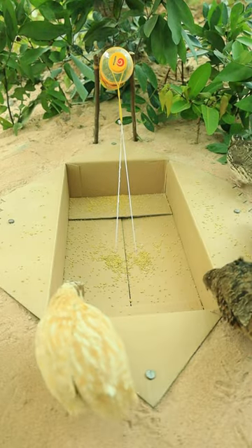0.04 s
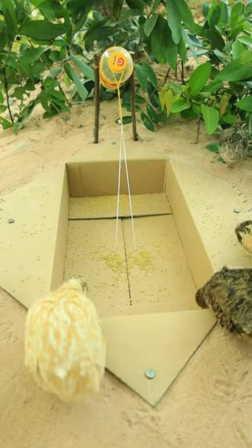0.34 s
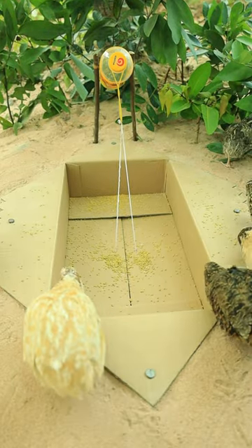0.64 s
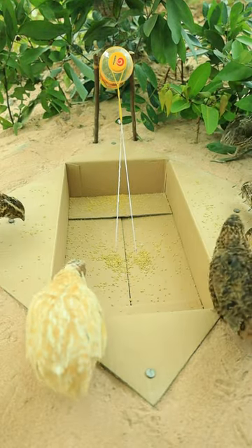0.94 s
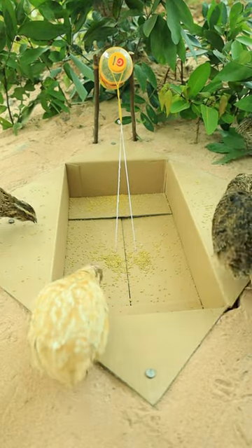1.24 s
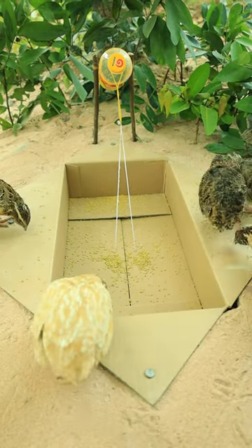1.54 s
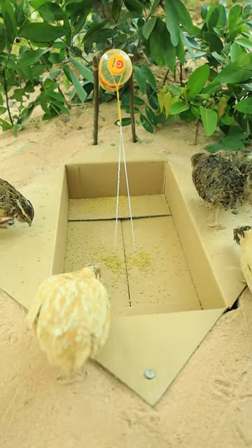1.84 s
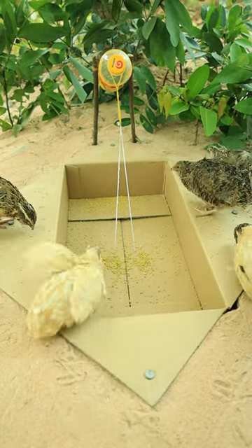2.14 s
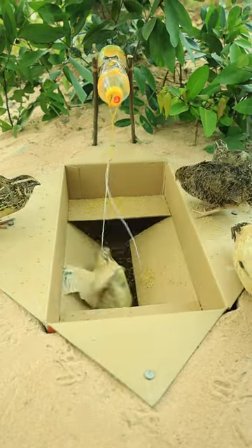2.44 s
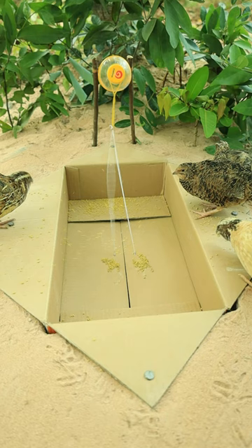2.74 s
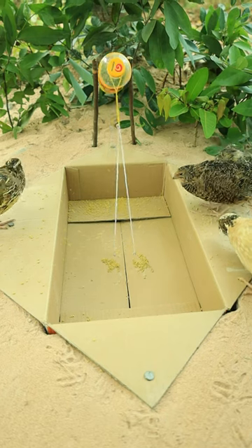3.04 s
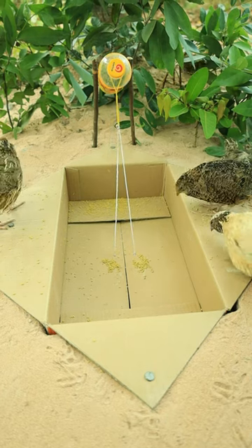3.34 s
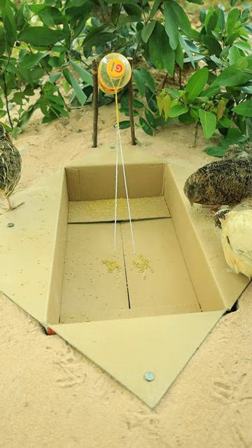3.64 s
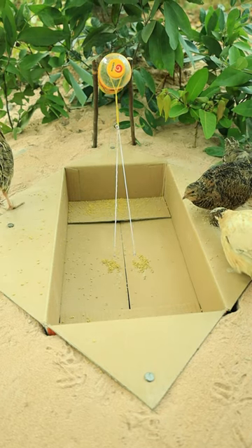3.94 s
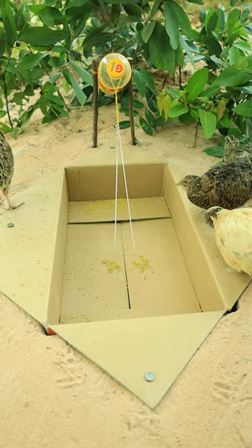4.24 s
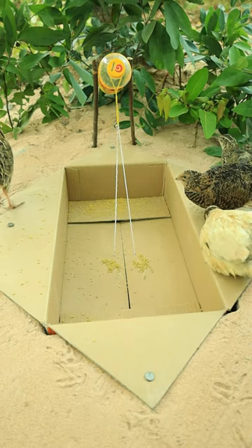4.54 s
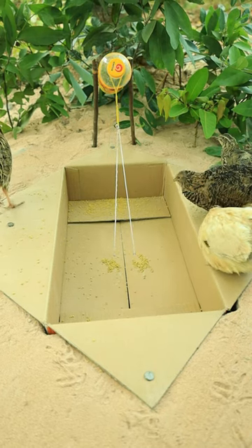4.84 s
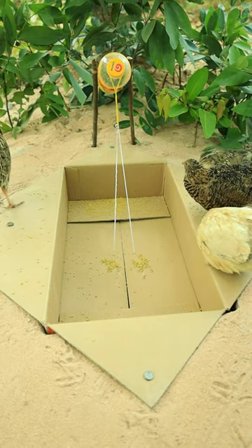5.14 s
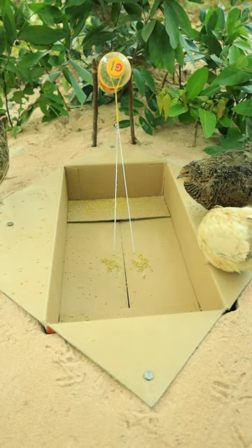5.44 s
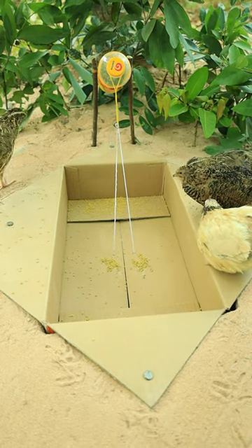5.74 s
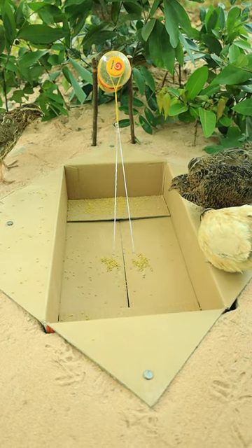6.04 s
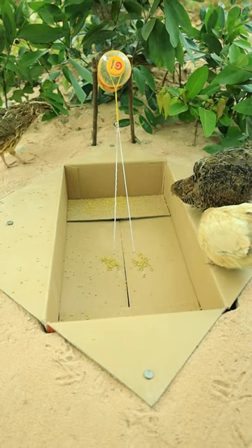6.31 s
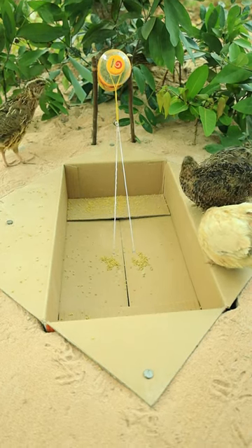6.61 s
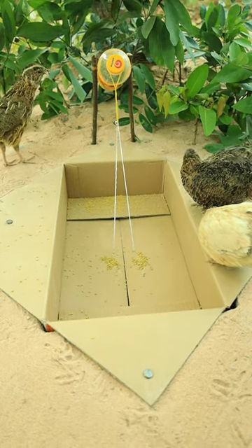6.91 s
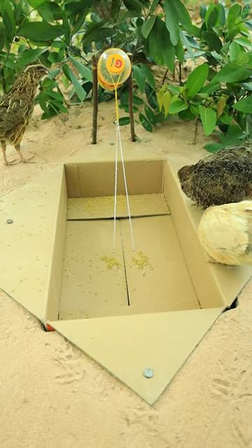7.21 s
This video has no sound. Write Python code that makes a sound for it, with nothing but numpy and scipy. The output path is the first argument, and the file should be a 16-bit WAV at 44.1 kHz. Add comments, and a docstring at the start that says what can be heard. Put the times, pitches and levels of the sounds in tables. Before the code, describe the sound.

Irregular beak taps on cardboard mix with sandy scratching, cracking seeds and brief soft peeps from quail near the microphone. Then comes the loudest moment: a bird drops into a hollow box, bumping and beating its wings as grain slides after it. The rush fades within a second and the clacking pecks carry on, above quiet outdoor air and a faint far hum.

```python
"""In a sandy yard, quail peck grain and scratch about on a cardboard pit trap, peeping softly.
Each peck is an impact that excites the modes of the sheet: it clacks, and the wide flaps boom.
Seeds snap and feet rub sand over the card, above quiet air and a faint far hum. One bird drops
through the trapdoor with thumps that resonate in the box, beating wings and a rush of sliding
grain; the others go on pecking."""
import sys
import numpy as np
from scipy import signal
from scipy.fft import rfft, irfft, next_fast_len
from scipy.io import wavfile
from scipy.ndimage import uniform_filter1d

SR = 44100
rng = np.random.default_rng(int(sys.argv[2]) if len(sys.argv) > 2 else 0)


def output_pcm(signal):
    """Save a mono or channel-first signal as 16-bit PCM at the path in sys.argv[1].

    Samples are clipped to [-1, 1] before scaling.
    """
    pcm = np.clip(np.atleast_2d(signal).T, -1, 1) * 32767
    wavfile.write(sys.argv[1], SR, np.round(pcm).astype(np.int16))


N = 329427
TIME = np.arange(N) / SR

# Likeness of the sound at the two microphone ports: (frequency [Hz], correlation [-1 to 1])
PORT_CORRELATION = [(200, .999), (650, .98), (1400, .75), (2900, .3), (7000, .12), (15000, -.06)]
# Imbalance of the ports: (frequency [Hz], left over right [dB])
PORT_BALANCE = [(200, 0.5), (450, 2), (1300, 1.5), (2400, 3.5), (4400, -0.2), (8100, 3.5), (13000, -2)]
# Spectrum of the outdoor air: (frequency [Hz], relative level [dB])
AIR_SPECTRUM = [(15, -48.5), (25, -5.5), (236, -2.5), (285, -4), (489, -6.5), (607, -11), (1070, -14.5),
                (1160, -12), (1480, -14), (2610, -12.5), (3160, -18.5), (4490, -19.5), (16000, -31.5)]
# Bouts of shuffling feet: (start [s], duration [s], relative level [dB], sandiness [dB]);
# sandiness favours the hiss over the scrape
SHUFFLES = [(0, .32, -51.5, -2), (0.436, 0.11, -61, 10), (0.596, 0.14, -47, -2.5), (0.812, 0.16, -43, -2.5),
            (1.04, 0.32, -43, -3), (1.345, 0.069, -45, -4), (1.404, 0.089, -33, -7),
            (1.519, 0.13, -38.5, -5.5), (1.6, 0.29, -45, -3.5), (1.917, .12, -42.5, -7.5),
            (2.068, 0.15, -29.5, -8.5), (3.196, .42, -45, 0), (3.665, .19, -44, -6),
            (4.223, 0.043, -38.5, -3), (4.344, 0.15, -43, -8.5), (4.459, 0.13, -44, -1.5),
            (4.56, 0.17, -55, -3), (5.277, .16, -49, -3), (5.482, 0.082, -53.5, -8),
            (5.895, 0.4, -60, -3.5), (6.491, 0.16, -56, -6)]
# Grain pours as the trapdoor tips and again as it swings back:
# (start [s], rise [s], hold [s], decay rate [dB/s], relative level [dB], sandiness [dB])
POURS = [(2.196, .14, 0.12, 187, -29.5, 0.5), (2.486, 0.09, 0.24, 34, -32.5, 4)]
# Spectrum of grain rubbing the cardboard: (frequency [Hz], relative level [dB])
SCRAPE_SPECTRUM = [(130, -6), (220, -1.5), (297, -7.5), (357, -4), (501, -7.5), (564, -1.5), (695, -1.5),
                   (989, -7), (1370, 0), (1730, 2.5), (1950, -7.5), (2710, 0), (5000, -23), (6500, -52),
                   (11000, -120)]
# Spectrum of sliding sand and seed: (frequency [Hz], relative level [dB])
HISS_SPECTRUM = [(2500, -17), (3700, 2), (4900, 1.5), (7500, 3.5), (8700, -4.5), (10500, 3.5), (12000, -2),
                 (14500, 5), (16000, -9.5)]
# Short gritty scrapes, faint ticks and the bright sparkle of some pecks:
# (start [s], duration [s], level [dB], centre [Hz], half-width [octaves])
GRIT_BURSTS = [(0.15, 0.033, -40, 6040, 3.4), (0.495, 0.018, -40.5, 1720, 0.95),
               (0.819, 0.0097, -37, 11000, 1), (0.836, 0.0074, -23.5, 13200, 0.49),
               (0.888, 0.068, -37, 3270, 0.36), (1.187, 0.04, -36.5, 3050, 0.61),
               (1.43, 0.012, -29, 6550, 1.2), (1.459, 0.011, -30.5, 7940, 0.48),
               (2.035, 0.11, -35, 2970, 1.5), (2.151, 0.046, -32, 5630, 0.72),
               (2.347, 0.085, -30, 1470, 1.1), (2.437, 0.032, -24.5, 2900, 0.43),
               (2.626, 0.057, -24.5, 11700, 0.34), (3.462, 0.099, -33.5, 4150, 0.87),
               (3.576, 0.012, -32.5, 3650, 1.1), (4.095, 0.01, -39.5, 1730, 0.64),
               (4.217, 0.087, -44, 3520, 1.1), (4.289, 0.051, -40, 2430, 1.2),
               (4.453, 0.059, -35, 1920, 1.4), (4.794, 0.0085, -35, 12800, 0.32),
               (6.129, 0.018, -43.5, 1700, 1.8), (7.358, 0.021, -46.5, 900, 1.26)]
# Calls: (start [s], duration [s], relative level [dB], first pitch [Hz], middle [Hz], last [Hz])
PEEPS = [(0.001, 0.039, -28, 3550, 3010, 2880), (0.03, 0.027, -37.5, 3540, 3680, 3580),
         (0.709, 0.036, -38.5, 2570, 2950, 2840), (0.763, 0.039, -41.5, 1010, 903, 960),
         (1.154, 0.018, -36, 1050, 1500, 2100), (1.174, 0.048, -34.5, 1604, 1343, 1570),
         (1.369, 0.042, -31, 1210, 1596, 1980), (1.529, 0.033, -30, 2150, 2055, 1560),
         (1.909, 0.072, -39, 1440, 2550, 2830), (2.075, .036, -31.5, 3680, 3250, 3050),
         (4.348, 0.062, -34.5, 1373, 1747, 1790), (4.387, 0.039, -35.5, 1990, 2150, 1380)]
# Seeds breaking in a beak or under a claw: (time [s], level [dB])
SNAPS = [(0.168, -42), (0.5376, -43), (1.2345, -33.5), (1.3164, -40), (1.5146, -41), (1.708, -32),
         (2.0996, -45), (2.782, -48), (3.0626, -30.5), (3.204, -34), (3.268, -36.5), (4.3847, -38.5),
         (4.5203, -37)]
# Envelope of the wings beating in the pit: (time [s], relative level [dB])
WING_ENVELOPE = [(2.15, -41.5), (2.526, -35.5), (3.05, -46)]
# Spectrum of the buffeted air in the pit: (frequency [Hz], relative level [dB])
PIT_SPECTRUM = [(29, -35), (50, -24), (91, 9), (136, 26), (385, 3), (491, -37), (800, -15), (1040, -48),
                (1760, -120)]
# Modes of the cardboard: (frequency [Hz], relative level [dB], decay time T60 [s])
CARDBOARD_MODES = [(93, -37, 0.35), (114.8, -17, 1), (127.9, 5, 0.14), (179.4, 3, 0.065), (188, -1.5, 0.08),
                   (227.3, -2, 0.063), (294.5, -3, 0.054), (375.7, -6, 0.06), (480, -2.5, 0.039),
                   (622, -4, 0.04), (753, -6.5, 0.08), (919, -5, 0.041), (1211, 3, 0.031), (1497, 1, 0.05),
                   (1639, 11.5, 0.021), (1753, -3, 0.068), (2100, -11, 0.083), (2424, -2, 0.038),
                   (2732, 0.5, 0.033), (2930, -8, 0.019), (3170, -4.5, 0.059)]
# Bands of an impact's boom, knock, clack and tick: (lower edge [Hz], upper edge [Hz])
IMPACT_BANDS = [(75, 215), (190, 1000), (1000, 4000), (4000, 16000)]
# Resonance of the hollow box under the trapdoor: (frequency [Hz], relative level [dB])
BOX_SPECTRUM = [(60, -16), (110, 4), (170, 9.5), (330, -3), (480, 3), (700, -18), (1500, -31), (4000, -70)]
# Bumps of the falling bird and the trapdoor; hardness is the level of clack over knock:
# (time [s], strength [dB], boom re strength [dB], hardness [dB], knock frequency [Hz])
BUMPS = [(2.232, -33, -5, -13.5, 240), (2.2626, -23.5, 0, -8.5, 683), (2.2815, -24.5, 6.5, -0.5, 303),
         (2.3468, -20.5, 1, -7.5, 510), (2.4092, -34, 19.5, -12, 885), (2.4426, -23, 5.5, 12, 730),
         (2.4502, -23.5, 1, 6, 687), (2.5687, -22, 4.5, -15.5, 550), (2.6186, -29, 3, -1, 510),
         (2.667, -33, 10.5, -8, 476), (2.7187, -25, 3, 0.5, 274), (2.729, -29.5, 10, -14, 262)]
# Pecks and steps on the cardboard: (time [s], strength [dB], boom re strength [dB], hardness [dB])
PECKS = [(0.0843, -35.5, -22, -4), (0.1503, -37.5, -19, -9), (0.1675, -31, -21, -1.5),
         (0.5368, -38.5, -11, -5.5), (0.701, -38, 4.5, -2), (0.823, -38, -12, 2), (0.836, -27, -5.5, 2.5),
         (0.8854, -36, 2, 7), (0.904, -37, -15, 2), (0.9627, -32, -30, 2), (1.0881, -43.5, 6.5, -15.5),
         (1.3171, -28.5, -7.5, 6), (1.377, -32.5, -12, 6.5), (1.415, -34, -24, -1), (1.5138, -36, -15, -1),
         (1.5613, -27.5, -7.5, 10.5), (1.6475, -38, 1, 8), (1.7064, -32.5, -2, -2.5),
         (1.7542, -42.5, 5, -7), (1.787, -27, -5, 7.5), (1.9471, -28.5, -1, 9.5), (2.1014, -34, -3, 10),
         (2.947, -33, 2, 5), (3.1124, -44.5, 8.5, -8), (3.2733, -28.5, -6, -2.5), (3.4483, -33.5, 4, 9.5),
         (3.6417, -33.5, -2, -0.5), (3.7947, -32.5, 1.5, -1.5), (3.9722, -30, -1, -2),
         (4.1573, -28.5, 0, 7.5), (4.3647, -30, 1.5, 3), (4.474, -38.5, -9, 20.5), (4.5196, -31, -12, 4.5),
         (4.5612, -28, -7, 6.5), (4.8051, -31, -0.5, 2), (5.019, -35.5, 4.5, 0.5), (5.214, -32, 0, 1),
         (5.3323, -41.5, 12, -7), (5.3613, -39.5, 0, 7.5), (5.4049, -40, 8, -11.5),
         (5.533, -41.5, 4.5, 5.5), (5.7532, -40.5, 3, 6.5), (5.9896, -39.5, 4.5, -3.5),
         (6.0987, -32, 0, 1.5), (6.2193, -39.5, 8.5, 3), (6.3032, -37, 1.5, 1), (6.4485, -37.5, 2, 2.5),
         (6.5437, -35.5, -5, 0), (6.597, -44.5, -9, -3), (6.6822, -38.5, 1.5, 1), (6.727, -38, -4.5, 1),
         (6.8685, -35.5, 2, 0.5), (6.9048, -31.5, -3, -3.5), (7.0608, -28, -2.5, -2.5), (7.09, -44.5, 7, 4),
         (7.2256, -35, -2, -6.5), (7.4477, -32, -6, 7)]


def amp(db):
    """Amplitude ratio of a level in decibels."""
    return 10 ** (np.asarray(db) / 20)


def unit(x):
    """Normalisation to an RMS of one."""
    return x / np.sqrt(np.mean(x ** 2) + 1e-20)


def curve_at(points, hz):
    """Interpolation of (frequency, value) points on a logarithmic frequency axis."""
    f, value = np.transpose(points)
    return np.interp(np.log(hz + 1), np.log(f + 1), value)


def add(mix, start, sound):
    """Superposition of a sound on the mix from a start time in seconds."""
    part = mix[:, max(round(start * SR), 0):][:, :sound.shape[1]]
    part += sound[:, :part.shape[1]]


def bandpass(x, edges_hz):
    """Butterworth filtering to one band."""
    return signal.sosfilt(signal.butter(3, edges_hz, "band", fs=SR, output="sos"), x)


def drift(size, seconds):
    """Random fluctuation of unit RMS, smoothed by moving averages."""
    width = max(int(seconds * SR), 1)
    return unit(uniform_filter1d(uniform_filter1d(rng.standard_normal(size), width), width))


def trapezoid(t, length, rise_s, fall_s):
    """Envelope of linear attack, hold and linear release."""
    return np.clip(np.minimum(t / rise_s, (length - t) / fall_s), 0, 1)


def at_ports(pair, spectrum):
    """Partial coherence: two noises, coloured by a dB table or function, agree in the bass only."""
    size = pair.shape[1]
    padded = next_fast_len(size)
    shared, separate = rfft(pair, padded)
    hz = np.fft.rfftfreq(padded, 1 / SR)
    correlation, lean_db = curve_at(PORT_CORRELATION, hz), curve_at(PORT_BALANCE, hz) / 2
    left = shared * amp(lean_db)
    right = (correlation * shared + np.sqrt(1 - correlation ** 2) * separate) * amp(-lean_db)
    colour_db = spectrum(hz) if callable(spectrum) else curve_at(spectrum, hz)
    return unit(irfft(np.array([left, right]) * amp(colour_db), padded)[:, :size])


def noise(size, spectrum):
    """Spectrally shaped Gaussian noise at the two ports."""
    return at_ports(rng.standard_normal((2, size)), spectrum)


def grains(per_s, spread_db, bed, decay_s=0.0004):
    """Shot noise: tiny random impacts of very uneven strength over a smooth bed of noise."""
    strengths = amp(spread_db * np.minimum(rng.exponential(1, N), 4.5))
    hits = strengths * (rng.random(N) < per_s / SR)
    power = signal.lfilter([1], [1, -np.exp(-1 / (decay_s * SR))], hits ** 2)
    return (unit(np.sqrt(power)) + bed) * rng.standard_normal((2, N))


def yard(air_db=-51.5, hum_hz=233, hum_width_hz=13, hum_db=-57, crumbs_db=-61):
    """Ambient noise: broadband air, a far narrowband hum and stray crumbs ticking on the card."""
    air = amp(1.1 * drift(N, 0.09)) * noise(N, AIR_SPECTRUM)
    hum = noise(N, lambda f: -20 * np.log10(1 + ((f - hum_hz) / hum_width_hz) ** 2))
    ticks = grains(per_s=30, spread_db=2.5, bed=0)
    crumbs = at_ports(ticks, [(150, -3), (700, -3.5), (2800, -17.5), (5000, -35), (15000, -28.5)])
    return amp(air_db) * air + amp(hum_db) * hum + amp(crumbs_db) * crumbs


def grain_motion(walk_end_s=3.85, walk_db=-55.5, walk_sand_db=-7, rise_s=0.022, fall_s=0.036):
    """Incoherent addition: walking, shuffling and pouring sum in power to scrape and hiss envelopes."""
    moves = [(amp(walk_db) * trapezoid(TIME, walk_end_s, rise_s, fall_s), walk_sand_db)]
    for start, length, db, sand_db in SHUFFLES:
        moves.append((amp(db) * trapezoid(TIME - start, length, rise_s, fall_s), sand_db))
    for start, rise, hold, decay_db_per_s, db, sand_db in POURS:
        t = TIME - start
        fade_db = decay_db_per_s * np.maximum(t - rise - hold, 0)
        moves.append((np.clip(t / rise, 0, 1) * amp(db - fade_db), sand_db))
    rubbing = np.sqrt(sum(gain ** 2 for gain, _ in moves))
    sliding = np.sqrt(sum((gain * amp(sand_db)) ** 2 for gain, sand_db in moves))
    return rubbing, sliding


def rustling(scrape_db=2, hiss_db=-1, clump_db=3, seed_db=-51.5, light_stir_db=-47):
    """Granular friction: sand and seed scrape and hiss in clumps while single seeds patter."""
    rubbing, sliding = grain_motion()
    scrape = at_ports(grains(per_s=700, spread_db=5, bed=1), SCRAPE_SPECTRUM)
    hiss = at_ports(grains(per_s=1100, spread_db=3, bed=1), HISS_SPECTRUM)
    seeds = at_ports(grains(per_s=60, spread_db=3, bed=0), HISS_SPECTRUM)
    # The patter grows more slowly than the hiss, so a pour masks it.
    patter = amp(seed_db) * (sliding / amp(light_stir_db)) ** 0.8
    clumps = unit(amp(clump_db * drift(N, 0.011)))
    return clumps * (amp(scrape_db) * scrape * rubbing + amp(hiss_db) * hiss * sliding) + patter * seeds


def grit_bursts(low_hz=450):
    """Band-limited shot noise: short gritty scrapes, faint ticks and the bright sparkle of some pecks."""
    out = np.zeros((2, N))
    grit = grains(per_s=1100, spread_db=4.5, bed=1)
    for start, length, db, centre_hz, octaves in GRIT_BURSTS:
        def hump_db(f):
            hump = 1 + (np.log2((f + 1) / centre_hz) / octaves) ** 4
            return -10 * np.log10(hump * (1 + f / centre_hz) * (1 + low_hz / (f + 1)) ** 2)
        burst = at_ports(grit[:, round(start * SR):][:, :round(length * SR)], hump_db)
        add(out, start, amp(db) * unit(burst * signal.windows.tukey(burst.shape[1], 0.65)))
    return out


def peeping(gain_db=-1, octave_db=-36, waver=0.013, rasp=0.24, lean_db=2, lag_rad=0.7):
    """Frequency and amplitude modulation: soft, trembling whistles each glide along one arc."""
    out = np.zeros((2, N))
    for start, length, db, *arc_hz in PEEPS:
        t = np.arange(0, length, 1 / SR)
        arc = np.polyval(np.polyfit([0, 0.5, 1], arc_hz, 2), t / length)
        pitch_hz = arc * (1 + waver * drift(len(t), 0.0007))
        phase = 2 * np.pi * np.cumsum(pitch_hz) / SR - np.array([[0], [lag_rad]])
        whistle = np.sin(phase) + amp(octave_db) * np.sin(2 * phase)
        tone = unit(whistle * (1 + rasp * drift(len(t), 0.0014)))
        add(out, start, amp(db + gain_db) * tone * trapezoid(t, length, rise_s=0.0043, fall_s=0.0082))
    return out * amp([[lean_db], [-lean_db]])


def snapping(low_hz=4000, dull_hz=9000, t60=0.033):
    """Brittle fracture: each cracking seed releases a short, bright burst of noise."""
    def burst_db(f):
        return -10 * np.log10((1 + (low_hz / (f + 1)) ** 4) * (1 + (f / dull_hz) ** 2))
    out = np.zeros((2, N))
    t = np.arange(SR // 50) / SR
    for start, db in SNAPS:
        add(out, start, amp(db) * unit(noise(len(t), burst_db) * amp(-60 * t / t60)))
    return out


def wing_beats(gain_db=-1, beat_hz=15, depth=0.38):
    """Amplitude modulation: wings buffet the air in the pit, so its low noise pulses."""
    times, levels_db = np.transpose(WING_ENVELOPE)
    envelope = amp(gain_db + np.interp(TIME, times, levels_db, left=-np.inf, right=-np.inf))
    return noise(N, PIT_SPECTRUM) * envelope * (1 + depth * np.sin(2 * np.pi * beat_hz * TIME))


def cardboard_ring(t, spot_modes, uneven_db=4, flap_detune=0.054, sheet_detune=0.03):
    """Free vibration: damped modes sum to the ring of the sheet and the swing of the flaps."""
    hz, db, t60 = np.array(CARDBOARD_MODES + spot_modes).T[:, :, None]
    detune, weight, phase_spread, polarity = rng.standard_normal((4, len(hz), 1))
    is_flap = hz < IMPACT_BANDS[0][1]
    sign = np.where(is_flap, 1, np.sign(polarity))  # the flaps all swing with the blow
    hz = hz * (1 + np.where(is_flap, flap_detune, sheet_detune) * detune)  # the birds' weight retunes it
    ring = sign * amp(db + uneven_db * weight - 60 * t / t60) * np.exp(2j * np.pi * hz * t)
    port_phase = phase_spread * np.arccos(curve_at(PORT_CORRELATION, hz))
    skew = amp(curve_at(PORT_BALANCE, hz) / 2) * np.exp(1j * port_phase / 2)
    modes = np.array([(ring * skew).imag, (ring / skew).imag])
    return (modes * ~is_flap).sum(1), (modes * is_flap).sum(1)


def impact(strength_db, boom_db, hardness_db, knock_mode, clack_hz,
           hollow_db, tick_db, crush_db, flap_db):
    """Impulse response of the cardboard: a contact click, ringing modes and crunching fibres."""
    t = np.arange(SR // 5) / SR
    clack_mode, hollow_mode = (clack_hz, 3.5, 0.033), (225, hollow_db, 0.072)  # as in CARDBOARD_MODES
    sheet, flaps = cardboard_ring(t, [knock_mode, clack_mode, hollow_mode])
    u = t / 0.00009  # time in units of the contact's time constant
    click_db = 20.5 + 0.19 * hardness_db  # a soft foot lands with less of a click
    port_gains = amp(curve_at(PORT_BALANCE, clack_hz) / 2) ** np.array([[1], [-1]])
    click = amp(click_db) * u * (2 - u) * np.exp(-u) * port_gains
    fibres = noise(len(t), [(150, -32), (500, 8), (2900, -15), (4400, 10),
                            (8500, -3), (11000, -5), (15000, -1.5)])
    crunch = fibres * (amp(crush_db - 60 * t / 0.028) + amp(-25 - 60 * t))  # quick crush, faint tail
    panel = click + sheet + crunch
    sources = [panel + amp(flap_db) * flaps, panel, panel, panel]  # only the boom holds the flaps
    shares_db = [boom_db, -hardness_db / 2, hardness_db / 2, tick_db]  # beaks clack, soft bodies knock
    parts = [amp(strength_db + share_db) * unit(bandpass(source, edges))
             for share_db, source, edges in zip(shares_db, sources, IMPACT_BANDS)]
    return sum(parts) * np.sqrt(1 / 10)  # levels refer the energy to a tenth of the ring's length


def tumbling(bump_db=-1, box_db=-6.5, box_t60=0.28):
    """Cavity resonance: the bird falls, the trapdoor swings shut, and each bump drums in the box."""
    out = np.zeros((2, N))
    t = np.arange(SR // 4) / SR
    for start, strength_db, boom_db, hardness_db, knock_hz in BUMPS:
        bump = impact(strength_db, boom_db, hardness_db, knock_mode=(knock_hz, 5, 0.044), clack_hz=1260,
                      hollow_db=-2.5, tick_db=-16, crush_db=-5, flap_db=6)
        add(out, start, amp(bump_db) * bump)
        add(out, start, noise(len(t), BOX_SPECTRUM) * amp(strength_db + box_db - 60 * t / box_t60))
    return out


def pecking(rim_below_db=-10.5, spot_scatter=0.073):
    """Point excitation: the ring depends on where a beak or foot lands, never twice on one spot."""
    out = np.zeros((2, N))
    tunings = np.exp(spot_scatter * rng.standard_normal((len(PECKS), 2)))
    for (start, strength_db, boom_db, hardness_db), (knock_ratio, clack_ratio) in zip(PECKS, tunings):
        if boom_db < rim_below_db:  # the firm rim hardly stirs the flaps or the hollow
            knock_hz, ring_db, hollow_db = 329, 6, -14
        else:  # a free flap, with the hollow answering beneath
            knock_hz, ring_db, hollow_db = 763, 0.5, -0.5
        peck = impact(strength_db, boom_db, hardness_db,
                      knock_mode=(knock_hz * knock_ratio, ring_db, 0.046), clack_hz=1480 * clack_ratio,
                      hollow_db=hollow_db, tick_db=-17, crush_db=1, flap_db=4)
        add(out, start, peck)
    return out


def scene():
    """Linear superposition of the birds, the trap, the grain and the yard."""
    birds_and_trap = pecking() + tumbling() + snapping() + peeping()
    return birds_and_trap + grit_bursts() + rustling() + wing_beats() + yard()


def record(dry, low_cut_hz=62, band_edge_hz=16050):
    """Band limiting: the microphone rolls off the bass, then a steep low-pass cuts the top treble."""
    thinned = signal.sosfilt(signal.butter(2, low_cut_hz, "high", fs=SR, output="sos"), dry)
    lowpass = signal.firwin(401, band_edge_hz, window=("kaiser", 8), fs=SR)
    return signal.oaconvolve(thinned, lowpass[None], "same")


dry = scene()
out = record(dry)
output_pcm(out)
```